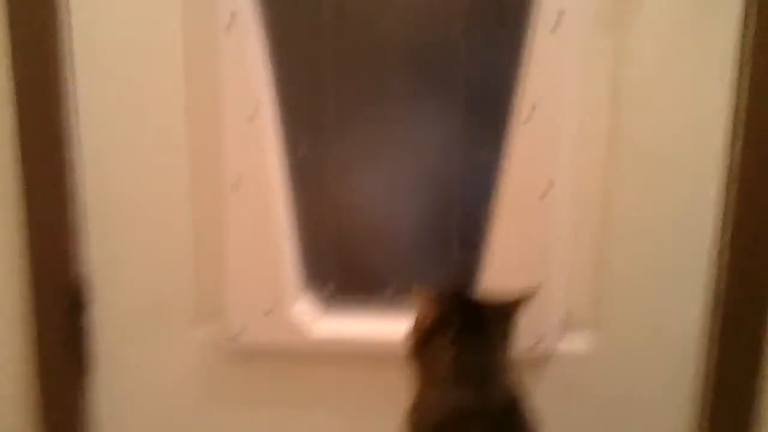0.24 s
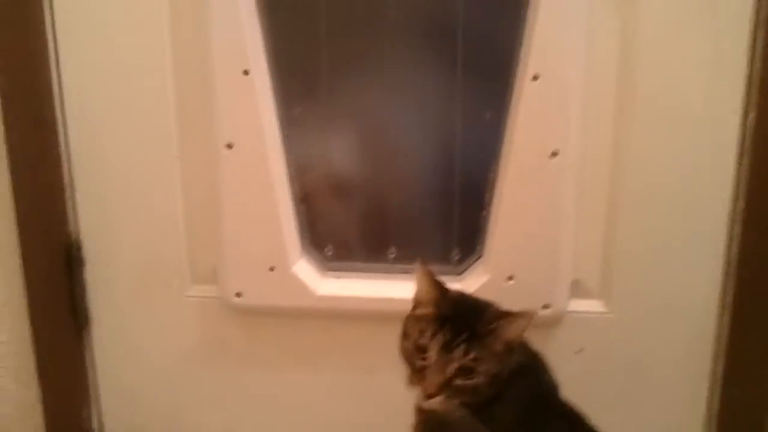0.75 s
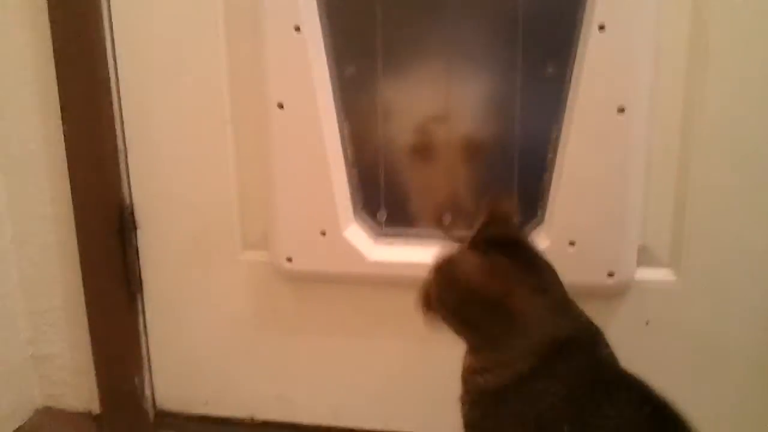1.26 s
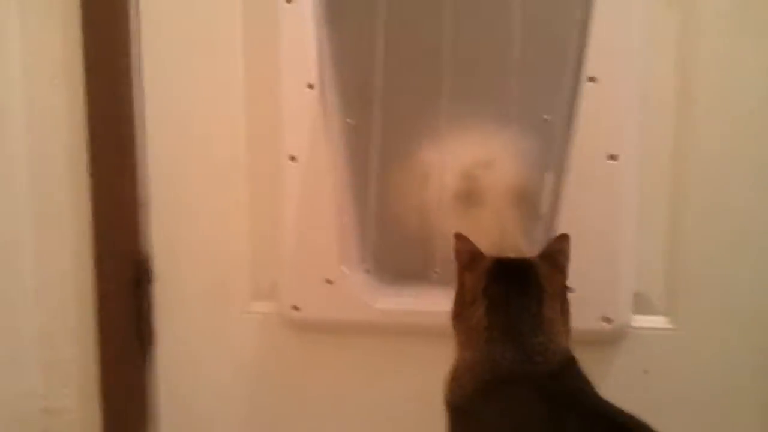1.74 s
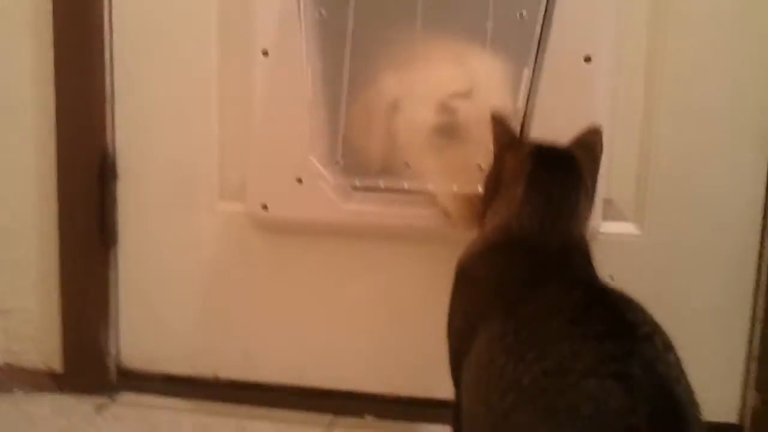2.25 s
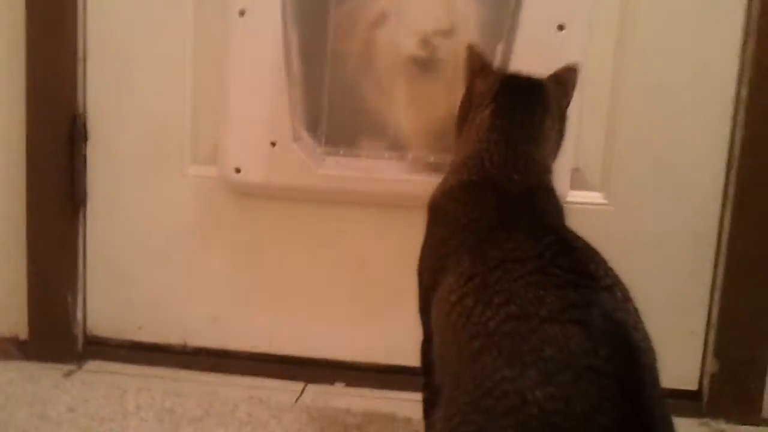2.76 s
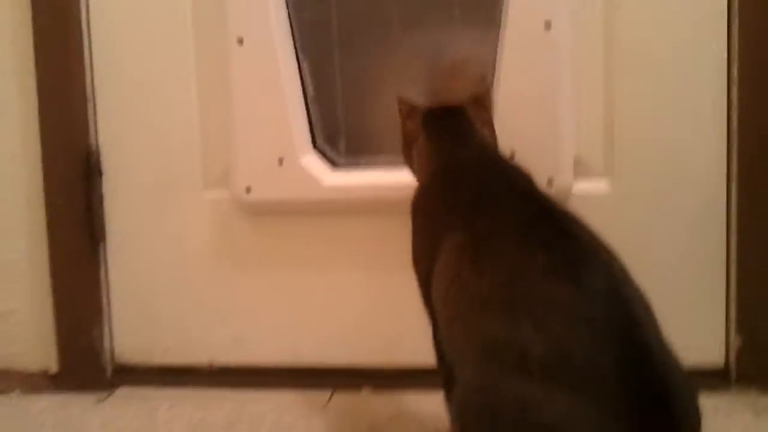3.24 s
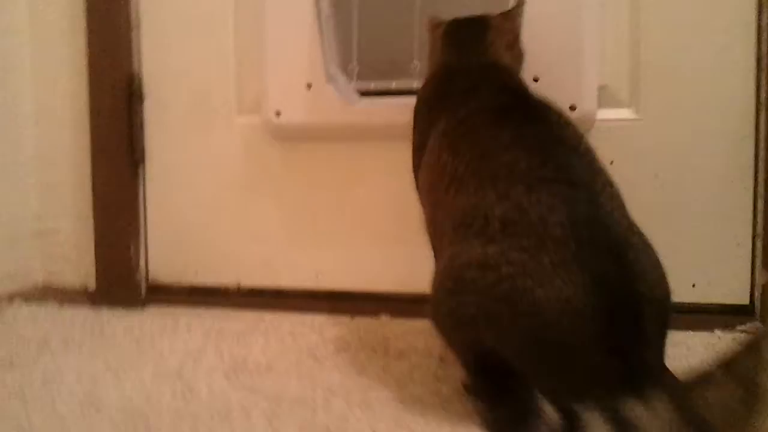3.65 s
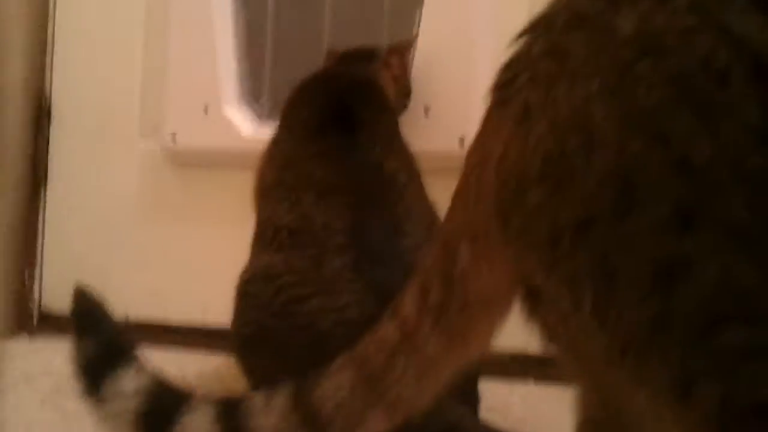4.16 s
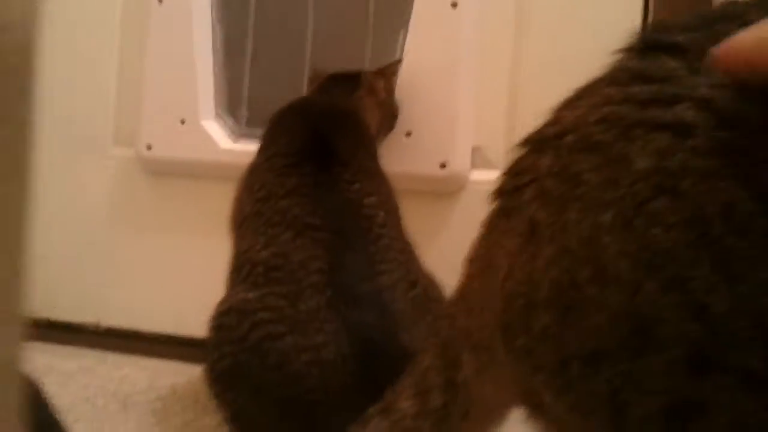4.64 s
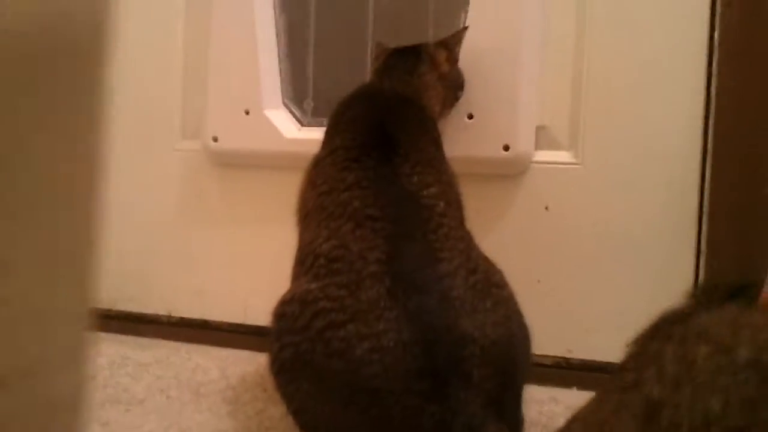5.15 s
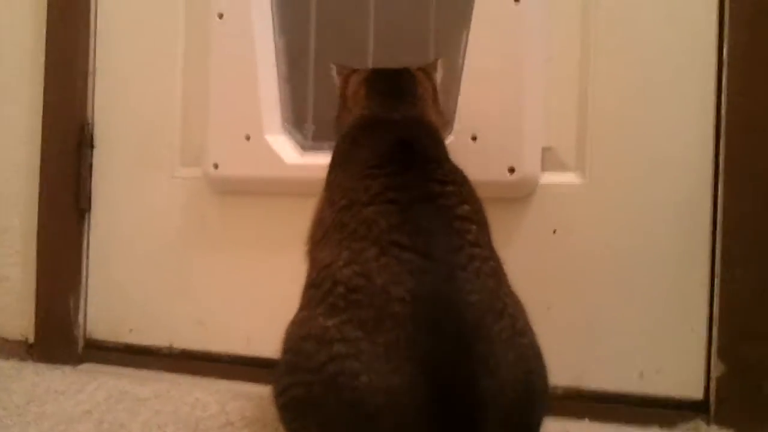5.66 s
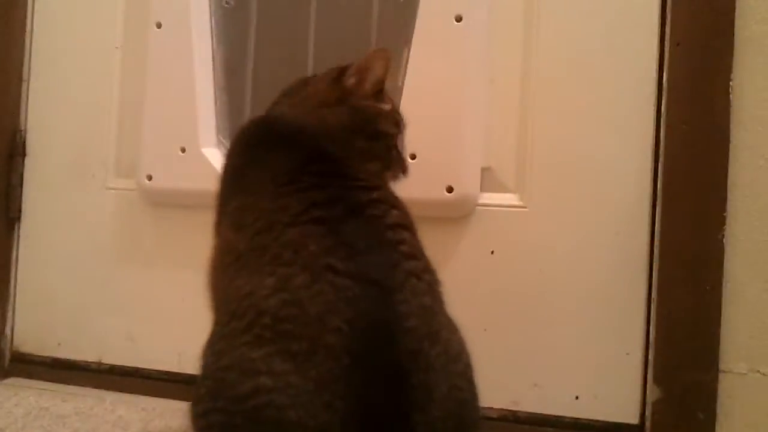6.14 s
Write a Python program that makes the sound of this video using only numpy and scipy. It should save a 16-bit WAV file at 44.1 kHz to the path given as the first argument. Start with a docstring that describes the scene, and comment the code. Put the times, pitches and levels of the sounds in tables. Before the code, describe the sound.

A plastic pet flap in a house door clacks against its frame in two short clusters, then breaks into a fast, clicking rattle that gradually weakens. The door rumbles low under the knocks, and fur rustles briefly between the clusters. The sound has the short echo of a small hallway and is picked up by a hand-held microphone with a steady hiss, a couple of handling pops and a sharp tick near the start.

```python
"""A rattling pet flap

A plastic pet flap in a house door is nudged, slaps its frame a few times and then rattles fast.
The door booms and the swinging flap pumps the air of a small hallway. Fur and paws rustle,
and a hand-held microphone adds pops, hiss and a drifting offset."""
import sys
import numpy as np
from scipy import signal
from scipy.io import wavfile
from scipy.ndimage import uniform_filter1d

SR = 44100
rng = np.random.default_rng(int(sys.argv[2]) if len(sys.argv) > 2 else 0)


def put_to_file(sound):
    """Save the sound as 16-bit audio at rate SR, in the file named by the first command-line argument."""
    columns = np.atleast_2d(sound).T  # one column per channel
    safe = np.clip(columns, -1, 1)
    whole_steps = np.round(safe * 32767)
    wavfile.write(sys.argv[1], SR, whole_steps.astype(np.int16))


N = 282286

# Hiss. Its tone colour: pitch_hz, relative_db. Its loudness: time_s, level_db
HISS_COLOUR = [(59, -34), (100, -4), (259, -7.5), (294, -13.5), (345, -8.5), (602, -10.5), (1110, -10.5),
               (1620, -13), (7300, -21), (9490, -58), (16100, -120)]
HISS_LEVEL = [(0, -45.5), (1.2, -47), (1.7, -45.5), (6.4, -45.5)]
# A faint band of noise near 2 kHz comes and goes: start_s, hold_s, level_db
WAVER_SWELLS = [(.35, 0.03, -53), (.82, 0.37, -56), (1.4, 2.1, -57), (2.66, 0.064, -49.5),
                (3.1, 0.27, -55.5), (3.85, 0.46, -54)]
# Pushes against the door: start_s, hold_s, air_db, boom_db, low_panel_db
PUSHES = [(0.207, 0.016, -31, -45, -55), (0.76, 0.017, -33, -35.5, -51.5), (1.57, 0.054, -36, -40, -52.5),
          (1.797, 0.034, -29.5, -30, -69), (1.898, 0.099, -55.5, -39, -39.5),
          (2.009, 0.036, -27.5, -29, -41), (2.098, 0.035, -38.5, -38, -39.5),
          (2.2, 0.15, -32.5, -46, -49.5), (2.551, 0.21, -38.5, -41.5, -53.5),
          (3.054, 0.023, -19.5, -53, -53), (3.096, 0.029, -30, -29, -58), (3.184, 0.12, -32.5, -34, -58),
          (3.517, 0.11, -22, -40.5, -74), (4.095, 0.034, -23, -60, -57), (4.144, 0.047, -28, -38, -39.5),
          (4.297, 0.037, -25, -46, -45), (4.364, 0.014, -18.5, -26.5, -57),
          (4.516, 0.042, -23.5, -34, -40.5), (4.583, 0.21, -22, -35.5, -57),
          (4.883, 0.11, -25.5, -31.5, -40), (5.073, 0.18, -28, -35, -44), (5.325, 0.017, -30, -31, -41),
          (5.44, 0.03, -37, -29, -35.5), (5.557, 0.028, -41, -37, -33.5), (5.673, 0.023, -33.5, -38, -40),
          (5.715, 0.21, -43, -29, -62)]
# How air, door, low panel and high panel shake. Gains add to the face level of a knock or slap:
# rest_db, knock_gain_db, slap_gain_db, lag_s, release_s
DOOR_SHAKE = [(-41.5, 7.5, -18.5, 0.0082, 0.037), (-45, -0.5, -22, 0.0017, 0.026),
              (-55.5, -4, -19.5, 0.029, 0.035), (-53, -1.5, -7.5, 0.024, 0.046)]
# Fingers pop on the microphone case: start_s, level_db, pitch_hz
POPS = [(0.2423, -25.5, 274), (0.386, -30.5, 260), (3.536, -37, 247)]
# A fingernail ticks on the case: start_s, peak_db
NAIL_TICK = [(.7833, -7)]
# Fur and paws, one list for each movement: time_s, level_db, centre_hz
RUSTLES = [
    [(.27, -60, 890), (.3, -55, 900), (.335, -57, 1000), (.35, -47, 2080), (.39, -50, 2020),
     (.42, -54, 1410), (.47, -47, 1120), (.53, -53, 1300), (.56, -77, 1290)],
    [(2.38, -52, 680), (2.44, -45, 784), (2.48, -41.5, 990), (2.5, -36, 990), (2.54, -41, 1110),
     (2.6, -44.5, 1220), (2.64, -53.5, 900), (2.7, -52, 910)],
]
# Single slaps and nudges:
# start_s, face_db, body_db, upper_face_db, edge_db, panel_db, contact_spread_s, face_pitch_hz
SLAPS = [(1.5753, -44.5, -44.5, -50, -43, -54, 0.0055, 1800),
         (1.6, -47.5, -61, -63, -56, -58, 0.0021, 1800),
         (1.8005, -35, -42.5, -38.5, -24.5, -63.5, 0.00017, 2010),
         (1.8298, -41.5, -42.5, -40, -39, -54, 0.0026, 1940), (1.9, -50, -42, -50, -53.5, -42, 0.013, 1800),
         (1.948, -46.5, -48, -50.5, -46, -55, 0.0029, 1920),
         (2.005, -35.5, -32, -37.5, -25, -33, 0.0015, 2300),
         (2.0105, -25, -31, -42.5, -34, -29, 0.00094, 1800),
         (2.064, -51.5, -55, -54, -52, -57, 0.00086, 1800), (2.1, -36, -41, -44, -52, -41, 0.004, 1900),
         (2.282, -39, -48.5, -49, -49, -57, 0.001, 1920), (2.4845, -36.5, -36, -46, -70, -49, 0.0006, 1037),
         (2.504, -58, -39.5, -45, -53, -60, 0.0016, 1490), (2.5598, -50, -46, -49, -73, -44.5, .003, 1210),
         (2.5796, -58, -49, -57, -47, -50, 0.0024, 1250),
         (2.9492, -52.5, -57, -48.5, -44.5, -57, 0.0032, 1800),
         (2.9616, -48.5, -60, -49, -42, -68, 0.0054, 1800),
         (3.0796, -40, -64, -60, -55.5, -54, 0.00087, 2050),
         (3.089, -34.5, -43.5, -50, -36.5, -48, 0.0012, 2350),
         (3.1078, -51, -52, -40.5, -37, -53, 0.0018, 2430), (3.123, -39, -60, -54, -56, -62, 0.00097, 1980),
         (3.142, -38, -55, -49, -52, -55.5, 0.0013, 2100), (3.157, -42, -60, -60, -60, -63, 0.00076, 2110),
         (3.22, -43, -52, -59, -48, -64, 0.0014, 2560), (3.2281, -38.5, -39, -53.5, -44, -57, 0.001, 1560),
         (3.5654, -46.5, -63, -54, -62, -69, 0.0035, 1800)]
# How long the hallway's echo takes to fall by 60 dB: pitch_hz, fade_s
ECHO_TIMES = [(300, 0.84), (520, 0.31), (800, 0.23), (2100, 0.27), (5500, 0.28)]
# The flap knocks on its frame while it is pushed about: start_s, face_db, edge_db, ping_db
PUSHED_KNOCKS = [(3.935, -55, -52, -55), (4.0639, -48.5, -55, -62.5), (4.1245, -38.5, -37.5, -32),
                 (4.1694, -45, -57, -44), (4.329, -48.5, -57, -62), (4.363, -42.5, -36.5, -27),
                 (4.4039, -44, -50, -46), (4.4627, -36, -34.5, -31), (4.5194, -41.5, -49, -31),
                 (4.6835, -38.5, -43, -34), (4.7774, -47, -45.5, -29.5), (4.8601, -36.5, -37.5, -50),
                 (4.9443, -42, -37.5, -27), (5.013, -38, -40.5, -46), (5.0946, -44.5, -47, -31.5),
                 (5.1621, -37, -42.5, -37), (5.2059, -43.5, -68, -52), (5.2596, -47, -69.5, -58)]
# The lower tones of each ping: pitch_hz, above_face_db
LOWER_PINGS = [(2480, 6.5), (3850, 3)]
# The edge squeaks on the frame near 3.5 kHz, and one short dry knock sounds near 1.5 kHz: middle_s, level_db,
# pitch_hz
SQUEAKS = [(4.343, -45, 3450), (4.765, -46, 3480), (4.936, -38, 3480), (5.084, -39.5, 3480),
           (5.738, -35, 1550)]
# Pops and slaps jolt the microphone's offset: start_s, step_size, recovery_s
OFFSET_JOLTS = [(0, .045, 1.2), (.245, .07, 1.0), (.78, .04, .8), (1.8, .09, .06), (3.53, .03, .3),
                (4.3, .035, .6)]

# A mode is a pitch at which something rings. All tables below list: pitch_hz, width_hz, level_db. # The highest
# entry in each edge list is no ringing of the flap: it adds a faint high sizzle above the treble cut
WAVER_MODES = [(2000, 450, 0.5), (2260, 390, -2)]
AIR_MODES = [(14.1, 8.1, 0), (29.6, 11.2, 0), (40.6, 9.3, -8.5)]
BOOM_MODES = [(65.7, 14.86, -3), (73.95, 13.4, 0.5), (81, 21.4, -7.5)]
LOW_PANEL_MODES = [(130.6, 15, -5), (218.6, 15.3, 3.5)]
HIGH_PANEL_MODES = [(274.2, 20, -1.24), (325, 138, -4.5)]
CASE_MODES = [(1920, 450, 1.5), (4470, 650, 0), (6960, 4300, -1.5)]
FRAME_MODES = [
    [(1360, 1300, 0.5), (1800, 530, 0), (2300, 650, -3.5)],
    [(564, 220, 4), (800, 470, 5.5), (1134, 470, -2.5)],
    [(2900, 1600, 1), (3880, 1500, -1)],
    [(4700, 890, -1.5), (5830, 1400, 0), (7700, 4800, -3.5), (8600, 910, 7.5)],
]   # four lists for a slap: face, body, upper face, edge (its top entry a faint high sizzle)
SLAPPED_PANEL_MODES = [(208.5, 28, -5), (283.7, 27, -7), (314.7, 8.3, -7.5), (353, 14, -8), (448, 33, -3.5)]
FACE_MODES = [(1260, 380, 2), (1560, 370, 2.5), (1924, 430, 6), (2230, 365, 5.3), (2600, 500, 1.8)]
HELD_FACE_MODES = [(2810, 430, 4.0)]   # added while the flap is held and pushed
BODY_MODES = [(470, 180, -10.5), (846, 666, -2), (955, 513, 1.5)]
EDGE_MODES = [(3570, 500, 4.5), (4564, 700, -1.5), (5840, 1100, -1), (6490, 4400, -8), (9000, 1500, 4)]


def amp(db):
    """Turn decibels into a number to multiply by."""
    return 10 ** (np.asarray(db) / 20)


def unit_level(x):
    """Scale a signal so that its average power is 1."""
    return x / np.sqrt(np.mean(x ** 2) + 1e-20)


def in_time(rows):
    """Join a table's points with straight lines, giving one value per sample."""
    times, *columns = np.transpose(rows)
    return [np.interp(np.arange(N) / SR, times, column) for column in columns]


def at_hz(points, hz):
    """Read a table at any pitch, with octaves evenly spaced."""
    pitches, values = np.transpose(points)
    return np.interp(np.log(hz), np.log(pitches), values)


def resonate(x, modes):
    """Let a signal ring each mode, then add the rings with alternating signs."""
    out = 0
    for k, (hz, width, db) in enumerate(modes):
        r = np.exp(-np.pi * width / SR)
        feed, feedback = [(1 - r * r) / 2, 0, (r * r - 1) / 2], [1, -2 * r * np.cos(2 * np.pi * hz / SR), r * r]
        out = out + (-1) ** k * amp(db) * signal.lfilter(feed, feedback, x + 1e-18)
    return out


def noise_bands(size, low_hz, gain):
    """Noise in half-octave bands, each as strong as gain(hz) says."""
    edges = low_hz * 2 ** np.arange(0, np.log2(9000 / low_hz), .5)
    white = rng.standard_normal((2, size))
    filters = [signal.butter(2, pair, "band", fs=SR, output="sos") for pair in zip(edges, edges[1:])]
    return sum(gain(edges[k] * 2 ** .25) * signal.sosfilt(sos, white[k % 2])
               for k, sos in enumerate(filters))


def swells(rows, attack_s, release_s):
    """The power of events that rise, hold and die away. Rows: start_s, hold_s, level_db."""
    out, t = np.zeros(N), np.arange(N) / SR
    for start, hold, db in rows:
        first, last = np.searchsorted(t, [start - 4 * attack_s, start + hold + 12 * release_s])
        age = t[first:last] - start
        rise = np.exp(-(np.minimum(age, 0) / attack_s) ** 2)
        fall = np.exp(-np.maximum(age - hold, 0) / release_s)
        out[first:last] += amp(db) ** 2 * rise * fall
    return out


def fade_in(t, rise_s):
    """A smooth climb from 0 to 1."""
    return 1 - np.exp(-(t / rise_s) ** 2)


def background():
    """The microphone hisses, and a faint narrow band of noise comes and goes."""
    hiss = unit_level(noise_bands(N, 95.1, lambda hz: amp(at_hz(HISS_COLOUR, hz))))
    waver = unit_level(resonate(rng.standard_normal(N), WAVER_MODES))
    waver_level = np.sqrt(swells(WAVER_SWELLS, attack_s=0.014, release_s=0.058))
    return amp(in_time(HISS_LEVEL)[0]) * hiss + waver_level * waver


def door():
    """Air, door and panels rumble softly and swell with each push, slap and knock."""
    out = 0
    for k, modes in enumerate((AIR_MODES, BOOM_MODES, LOW_PANEL_MODES, HIGH_PANEL_MODES)):
        rest_db, knock_db, slap_db, lag_s, release_s = DOOR_SHAKE[k]
        shakes = [(start + lag_s, 0, face_db + knock_db) for start, face_db, *_ in all_knocks()]
        shakes += [(start + lag_s, 0, face_db + slap_db) for start, face_db, *_ in SLAPS]
        if k < 3:   # pushes do not move the high panel
            shakes += [(start, hold, levels[k]) for start, hold, *levels in PUSHES]
        level = np.sqrt(amp(rest_db) ** 2 + swells(shakes, attack_s=0.0099, release_s=release_s))
        rumble = resonate(rng.standard_normal(N + SR), modes)[SR:]
        out = out + level * unit_level(rumble)
    return out


def handling():
    """Fingers make dull one-cycle pops on the microphone case, and a nail makes one sharp tick."""
    out, click = np.zeros(N), np.zeros(N)
    for start, db, hz in POPS:
        cycles, i = np.arange(SR // 20) / SR * hz, round(start * SR)
        crest = 2.8 * np.exp(-((cycles - .2) / 0.1) ** 2)
        dip = 2.5 * np.exp(-(cycles - 1) ** 2 / 0.16)
        tail = .5 * cycles * np.exp(-cycles / 2) * (cycles > 2)
        out[i:i + len(cycles)] += amp(db) * (crest - dip + tail)
    tick_s, tick_db = NAIL_TICK[0]
    click[round(tick_s * SR)] = 1
    tick = resonate(click, CASE_MODES)
    return out + amp(tick_db) * tick / np.max(np.abs(tick))


def rustle():
    """Fur and paws brush past: grainy noise whose pitch wanders."""
    out = np.zeros(N)
    grains = rng.standard_normal(N) * amp(2.0 * rng.standard_normal(N // 200 + 1).repeat(200)[:N])
    for rows in RUSTLES:
        db, hz = in_time(rows)
        first, last = round(rows[0][0] * SR), round(rows[-1][0] * SR)
        fade = signal.windows.tukey(last - first, .15)
        for centre_hz in np.geomspace(600, 2600, 7):
            nearness = np.exp(-(np.log2(hz / centre_hz) / 0.35) ** 2)
            mode = [(centre_hz, 0.5 * centre_hz, 0)]
            band = unit_level(resonate(resonate(grains, mode), mode))
            out[first:last] += 1.16 * fade * (amp(db) * nearness * band)[first:last]
    return out


def hallway_blow(direct_s, echo_db, build_s, tail_share=1, rise_s=0.0007):
    """A blow in the hallway: a short burst of noise, then echoes that build up and die away."""
    t = np.arange(SR // 3) / SR
    echoes = noise_bands(len(t), 200, lambda hz: amp(-60 * t / (tail_share * at_hz(ECHO_TIMES, hz))))
    direct = rng.standard_normal(len(t)) * np.minimum(t / rise_s, 1) * np.exp(-(t / direct_s) ** 2)
    return direct + amp(echo_db) * echoes * fade_in(t, build_s)


def strike(start_s, contacts, parts):
    """One hit rings several parts of the plastic. Each part lists: blow, modes, level_db."""
    out, i = np.zeros(N + SR), round(start_s * SR)
    for blow, modes, db in parts:
        ring = 0
        for k, mode in enumerate(modes):
            tone = resonate(resonate(blow, [mode]), [mode])   # twice, to cut nearby pitches harder
            ring = ring + (-1) ** k * amp(mode[2]) * unit_level(tone)
        ring = ring / np.sqrt(np.mean(ring[:SR // 30] ** 2))
        sound = signal.fftconvolve(contacts, ring)
        out[i:i + len(sound)] += amp(db) * sound
    return out[:N]


def slaps():
    """The flap lands along its length and shakes the whole frame. The door panel rings on."""
    out, t = np.zeros(N), np.arange(SR // 3) / SR
    for start, *part_levels, panel_db, contact_s, face_hz in SLAPS:
        shift = face_hz / 1800   # where the flap lands moves the face modes from their usual pitch
        face = [(hz * shift, width * shift, db) for hz, width, db in FRAME_MODES[0]]
        spread_s = 2 * np.clip(contact_s, .0002, .02)
        blow = hallway_blow(0.0094 + spread_s, echo_db=-2, build_s=0.0087 + spread_s, rise_s=spread_s)
        parts = [(blow, modes, db) for modes, db in zip([face] + FRAME_MODES[1:], part_levels)]
        out += strike(start, np.ones(1), parts)
        panel = sum(resonate(rng.choice([-1, 1]) * (t == 0), [mode]) / mode[1]
                    for mode in SLAPPED_PANEL_MODES)
        panel *= fade_in(t, rise_s=0.012)   # the panel takes up the blow slowly
        i = round(start * SR)
        out[i:i + len(t)] += amp(panel_db) * panel / np.sqrt(np.mean(panel[:SR // 15] ** 2))
    return out


def all_knocks():
    """List the pushed knocks, the free swings and the one small bounce after each swing."""
    free = free_swings()
    bounces = free + [0.036, -6, -4.5, -6]   # delay_s, then face_db, edge_db and ping_db changes
    bounces[:, 1:] -= 3 * np.arange(len(free))[:, None]   # each loses 3 dB more than the last
    return np.vstack([PUSHED_KNOCKS, free, bounces])


def rattle():
    """At each knock the flap's edge clicks and chatters, then its face and body ring."""
    t, knocks, pushed = np.arange(SR // 10) / SR, all_knocks(), len(PUSHED_KNOCKS)
    chatter = 0.01 * rng.standard_normal((len(knocks), len(t))) ** 3 * np.exp(-(t / 0.033) ** 2)
    chatter[:, 0] = 1   # the first click
    body_blow = hallway_blow(direct_s=0.0027, echo_db=20.5, build_s=0.0019)
    spots = [hallway_blow(direct_s=0.0039, echo_db=-7, build_s=0.0024, tail_share=0.88)
             for _ in range(pushed + 1)]
    out, face_rise = 0, fade_in(np.arange(len(body_blow)) / SR, rise_s=0.002)
    for k, (start, face_db, edge_db, _) in enumerate(knocks):
        edge = np.array(EDGE_MODES, float)
        if k < pushed:   # each push lands on a new spot and bends the flap, shifting its modes
            blow, face = spots[k], FACE_MODES + HELD_FACE_MODES
            edge[:, 0] *= rng.normal(1, .025, len(edge))
            edge[:, 2] += rng.normal(0, 2.5, len(edge))
            edge[0, 2] -= 8.5   # holding the flap damps the lowest edge mode
        else:   # free swings all land near one spot
            blow, face = spots[-1] + 0.67 * spots[k % pushed], FACE_MODES
        body_db = -43.5 + 1.37 * (face_db + 38)   # harder knocks reach the body more
        parts = [(blow * face_rise, face, face_db), (body_blow, BODY_MODES, body_db),
                 (blow, edge, edge_db)]
        out = out + strike(start, chatter[k], parts)
    return out


def pings():
    """The edge pings at each knock: three short, scratchy tones that sag in pitch as it settles."""
    out, t, knocks = np.zeros(N + SR), np.arange(SR // 30) / SR, all_knocks()
    rise_s, settle_s, pitch_drop = .0036, 0.0093, 0.05
    sagging_time = np.cumsum(1 - pitch_drop * (1 - np.exp(-t / settle_s))) / SR
    shape = t / rise_s * np.exp(1 - t / rise_s)
    for k, (start, face_db, _, ping_db) in enumerate(knocks):
        i, detune = round(start * SR), rng.normal(1, 0.0077)
        roughness = .8 if k < len(PUSHED_KNOCKS) else .35
        top_hz = 4740 + 11.5 * np.clip(ping_db - face_db - 9.5, -5, 15)   # stronger pings are higher
        tones = [(top_hz, ping_db)] + [(hz, face_db + above_db) for hz, above_db in LOWER_PINGS]
        for hz, db in tones:
            noise = uniform_filter1d(rng.standard_normal((2, len(t))), size=40)
            flutter = 1 + roughness * (unit_level(noise[0]) + 1j * unit_level(noise[1]))
            flutter /= np.sqrt(1 + 2 * roughness ** 2)
            tone = np.imag(flutter * np.exp(2j * np.pi * detune * hz * sagging_time))
            out[i:i + len(t)] += amp(db) * shape * tone
    return out[:N]


def squeaks():
    """The flap rubs its frame and makes tiny, slightly rough blips; the lowest one is a short dry knock."""
    t, blip_s = np.arange(N) / SR, 0.004
    roughness = 1 + .35 * unit_level(uniform_filter1d(rng.standard_normal(N), size=60))
    return roughness * sum(amp(db) * np.sin(2 * np.pi * hz * t) * np.exp(-((t - middle) / blip_s) ** 2)
                           for middle, db, hz in SQUEAKS)


def free_swings(let_go_s=5.2953, count=10):
    """Let go, the flap knocks ever faster and softer. Rows: start_s, face_db, edge_db, ping_db."""
    k = np.arange(count)
    gaps_s, strength = .1 + .025 * .8 ** k, 0.81 ** k
    starts = let_go_s + np.cumsum(gaps_s) - gaps_s
    return np.transpose([starts, -41 + 7 * strength, -42 + 4.5 * strength, np.full(count, -30.5)])


def pumped_air(lead_s=.025):
    """The freely swinging flap pumps a slow pressure wave that peaks just before each knock."""
    peaks = free_swings()[:, 0] - lead_s
    peaks = np.r_[2 * peaks[0] - peaks[1], peaks, 2 * peaks[-1] - peaks[-2]]   # one more at each end
    turns = np.interp(np.arange(N) / SR, peaks, np.arange(len(peaks)))
    return .042 * np.minimum(turns, 1) * np.cos(2 * np.pi * turns)


def scene():
    """Add up all the sounds at one microphone."""
    flap = slaps() + rattle() + pings() + squeaks() + pumped_air()
    return (background() + door() + handling() + rustle() + flap)[None]


def record(dry):
    """The microphone shifts the wave off centre by a drifting offset and cuts the highest treble."""
    t, offset = np.arange(N) / SR, -.44
    for start, step, recovery_s in OFFSET_JOLTS:
        rise = np.clip((t - start) / .015, 0, 1) if start > 0 else 1
        offset = offset + step * rise * np.exp(-(t - start) / recovery_s)
    shifted, cutoff_hz = dry[0] + offset, 7800
    treble_cut = signal.cheby2(12, 45, cutoff_hz, fs=SR, output="sos")
    settled = signal.sosfilt_zi(treble_cut) * shifted[0]   # avoids a click at the start
    return signal.sosfilt(treble_cut, shifted, zi=settled)[0][None]


dry = scene()
out = record(dry)
put_to_file(out)
```